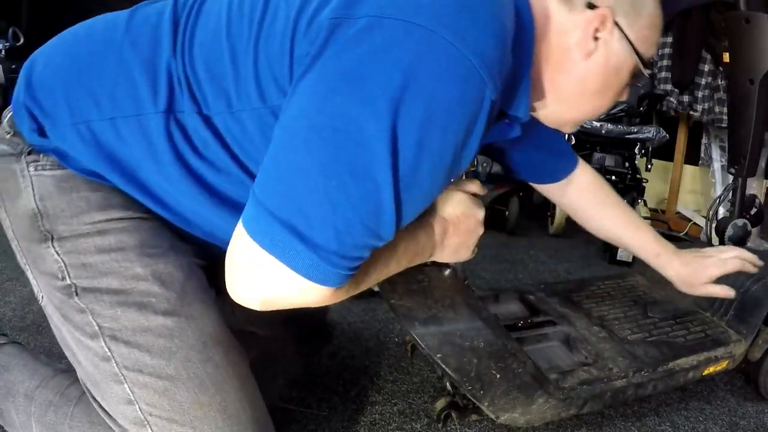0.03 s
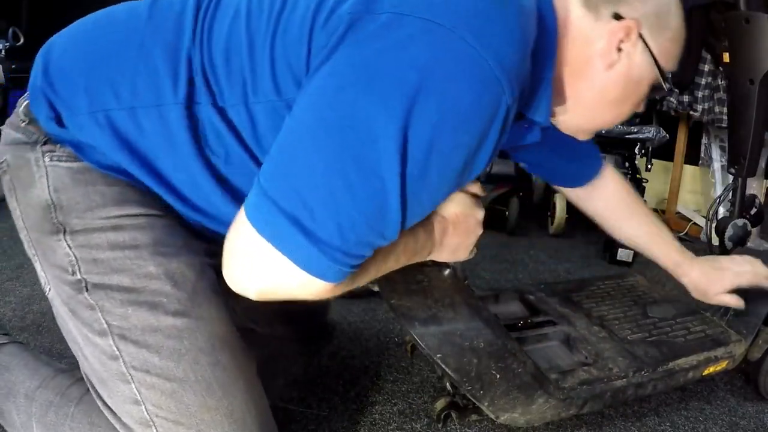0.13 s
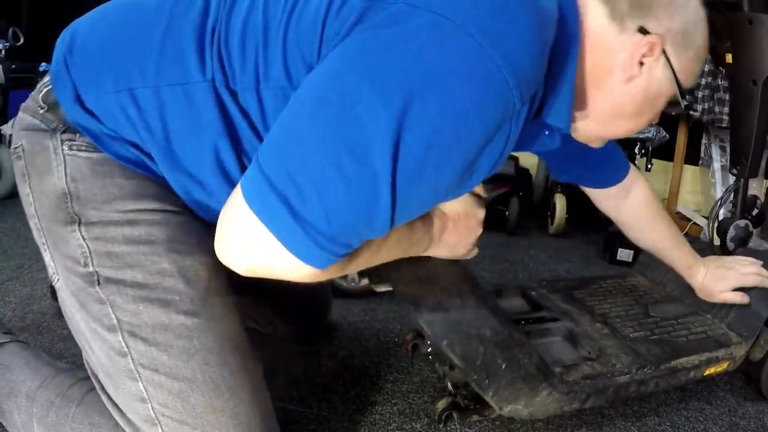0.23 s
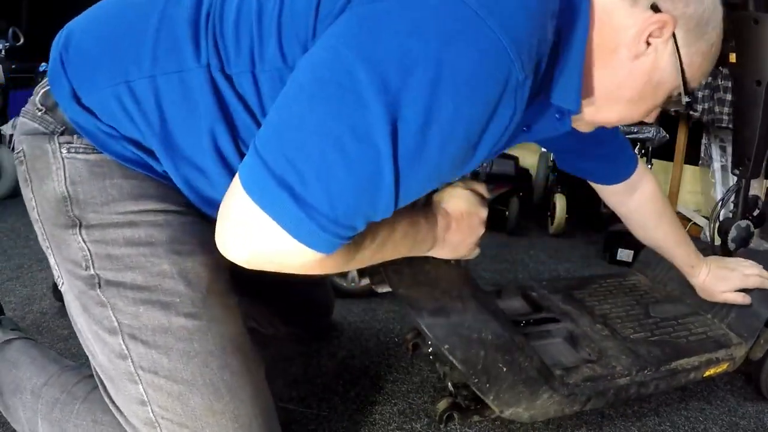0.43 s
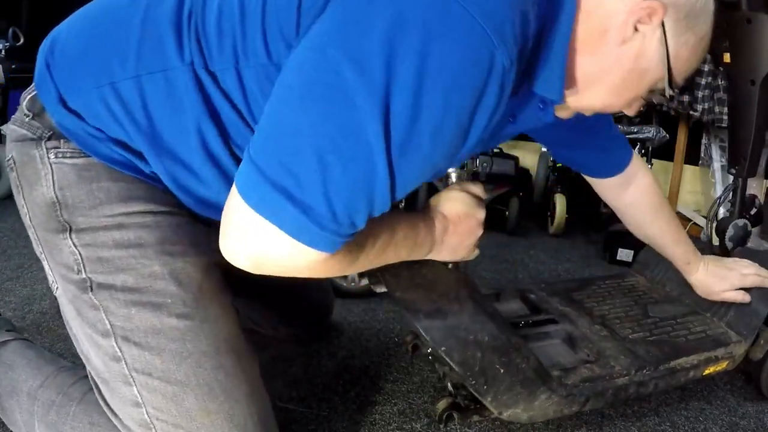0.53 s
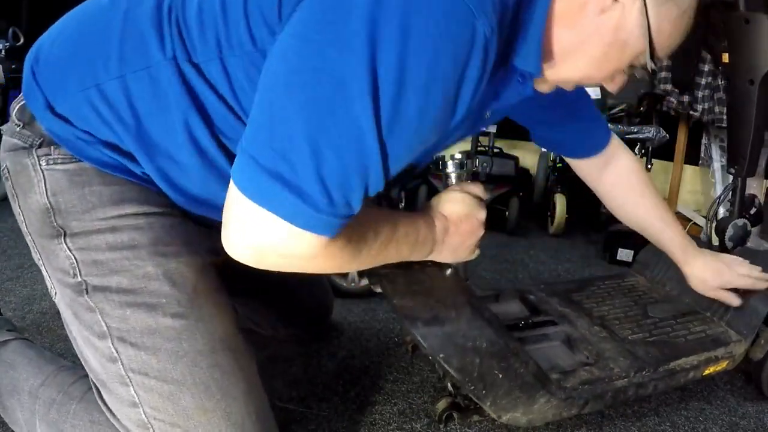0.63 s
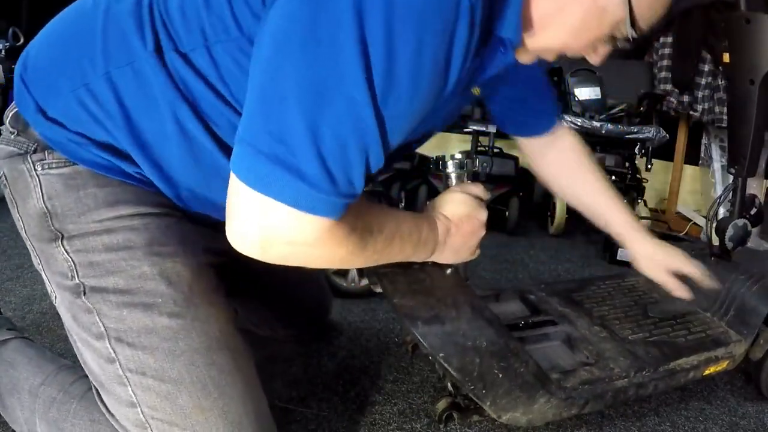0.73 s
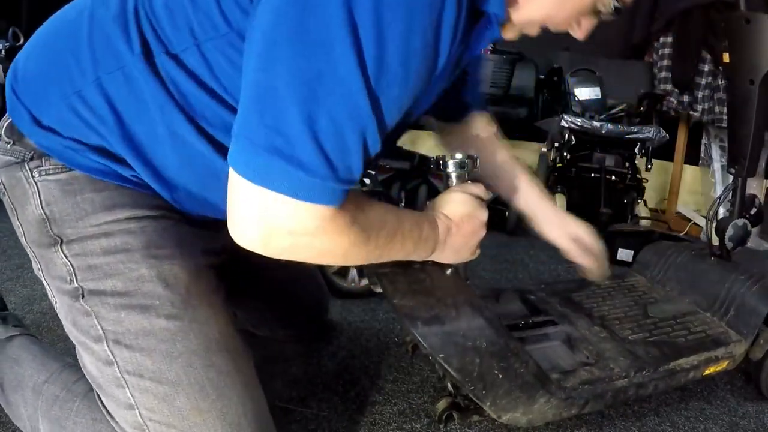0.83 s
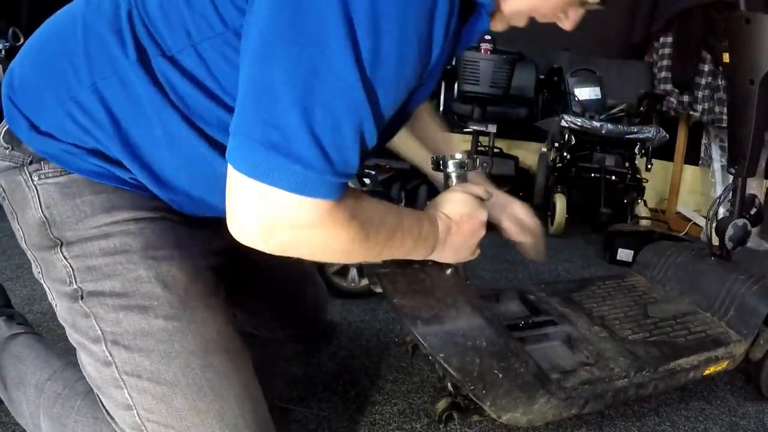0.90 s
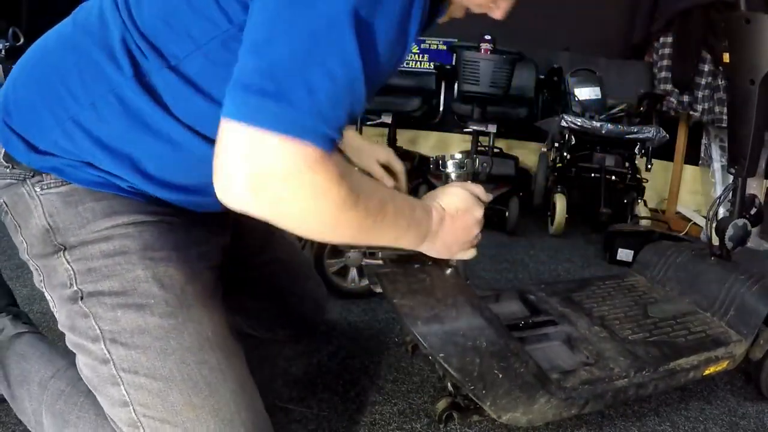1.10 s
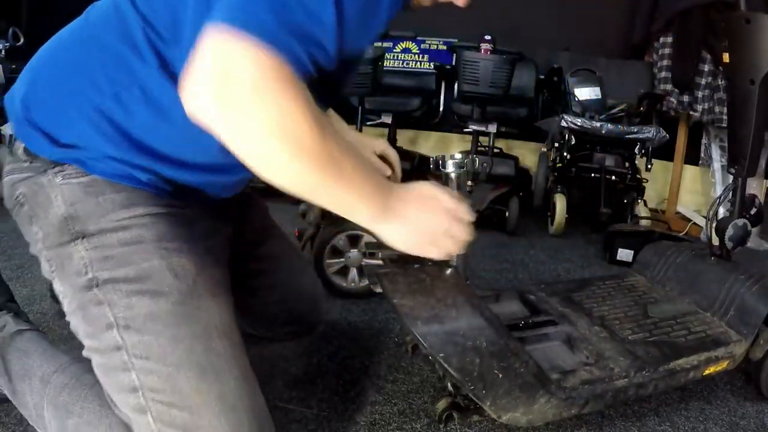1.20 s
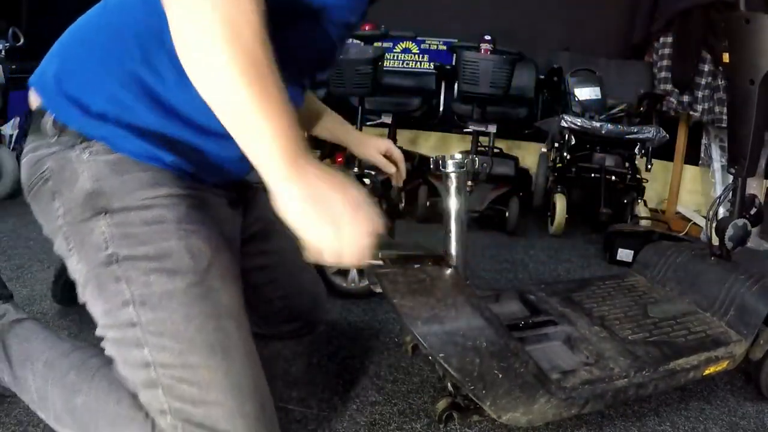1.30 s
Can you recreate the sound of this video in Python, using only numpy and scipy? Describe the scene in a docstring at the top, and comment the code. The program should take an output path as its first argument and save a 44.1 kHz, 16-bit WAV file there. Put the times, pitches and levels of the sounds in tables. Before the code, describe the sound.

One loud clank of metal and plastic scooter parts joining, followed by lighter knocks.

```python
"""Scooter frame pushed together

In a small workshop, steel tube and plastic deck meet in one loud clank: contacts clatter, the frame
rings and the chassis bounces on its tyres. Lighter knocks follow as the parts settle and are let go,
with a short scrape of the tube, a rustle of clothing and a dull bump near the end."""
import sys
import numpy as np
from scipy import signal
from scipy.io import wavfile
from scipy.ndimage import uniform_filter1d

SR = 44100
rng = np.random.default_rng(int(sys.argv[2]) if len(sys.argv) > 2 else 0)


def unload_wav(signal):
    """Save mono or channel-first audio to the path in sys.argv[1] as 16-bit WAV at rate SR, clipped to [-1, 1]."""
    wavfile.write(
        sys.argv[1],
        SR,
        np.round(np.clip(np.atleast_2d(signal).T, -1, 1) * 32767).astype(np.int16),
    )


N = 59535

# Contacts between parts. Each row: start in seconds, relative level in dB, part's lowest note in Hz,
# its Q, treble cutoff in Hz, ring gain in dB, tail gain in dB.
KNOCKS = [(0.228, -10, 203, 0.97, 8200, 5, -18), (0.2313, -1.5, 185, 1.28, 14100, 1.5, -5),
          (0.2345, -5, 560, 0.56, 12000, 0.5, -7), (0.237, -10, 233, 2.34, 6100, -35, -4),
          (.256, -9.5, 249, 2.14, 4560, 3, -11), (.322, -33.5, 232, 0.91, 2970, 4, -6),
          (0.421, -22, 1920, 1.05, 4530, 0.5, -3.5), (.445, -26, 476, 3.5, 540, 9, -2.5),
          (.45, -27, 96, 1.4, 390, 8, 3.5), (0.6334, -17, 658, 3.9, 2300, -6, -11.5),
          (0.6428, -19.5, 1000, 1.45, 3470, -24, -0.5), (0.6529, -22.5, 1480, 1.1, 4200, -15, -19),
          (0.6556, -21, 1477, 5.1, 2620, -20, -10), (.658, -18, 470, 1.62, 700, 9.5, -5.5),
          (.725, -32, 134, 1.07, 394, 5.5, 14), (.775, -33.5, 159, 2.1, 430, 3.5, 11),
          (0.886, -34.5, 3860, 2.5, 4140, -1, -7), (1.087, -10, 124, 1.23, 335, -6.5, -5.5),
          (1.0889, -29.5, 790, 1.3, 4800, 4.5, 1), (1.325, -29.5, 64.5, 6.6, 200, -0.5, 5.5)]
# Stereo width of knocks and cloth. Each row: frequency in Hz, side over mid in dB.
SIDE_DB = [(60, -29), (140, 1), (350, -37), (1200, -45), (2400, -22.5), (4400, -11), (8000, -7),
           (14000, 6.5)]


def knocks(t):
    """Each contact clatters, rings the frame and leaves a tail, all coloured by the struck part."""
    ring, out = frame_ring(t), np.zeros((2, N))
    for start_s, db, low_hz, q, soft_hz, ring_db, tail_db in KNOCKS:
        mid, side = (clatter(t, db) + amp(tail_db) * tail(t) for _ in range(2))
        hit = stereo(mid + amp(ring_db) * ring, side, SIDE_DB)
        add(out, start_s, amp(db) * struck_part(hit, low_hz, q, soft_hz))
    return out


def clatter(t, blow_db, base_decay_s=0.0077, click_share=0.19):
    """A contact click and brief chatter between the parts, longer after a harder blow."""
    # Each row: frequency in Hz, gain in dB.
    spectrum = [(40, -24.5), (110, 18), (200, 22), (420, 20.5), (560, 12.5), (1300, 9), (2500, 5),
                (3300, 0.5), (6000, -2), (9500, -11.5), (12500, -27), (16000, -22)]
    decay_s = base_decay_s * amp(blow_db) ** 0.067
    chatter = rng.standard_normal(N) * np.exp(-t / decay_s)
    chatter *= np.sqrt(1 - click_share) / np.linalg.norm(chatter)
    click = np.sqrt(click_share) * (t == 0)
    return colour(chatter + click, spectrum)


def frame_ring(t):
    """Frame modes; neighbours swing in opposite senses, so the ring builds over a few milliseconds."""
    # Each row: frequency in Hz, relative level in dB, T60 in seconds.
    modes = [(71.6, -25.5, 0.81), (94.7, -36.5, 1), (161.1, -41.5, 0.75), (214, -31.5, 0.12),
             (244, -37, 0.25), (265.7, -38.5, 0.26), (300, -37.5, 0.62), (355.8, -36.5, 0.23),
             (404.8, -40.5, 0.3), (481, -39, 0.62), (714.4, -39, 0.15), (794, -44, 0.26),
             (934.5, -44, 0.25), (1072, -35.5, 0.12), (1327, -49.5, 0.29), (1930, -40, 0.17),
             (2315, -39, 0.1), (2716, -36.5, 0.1), (3430, -45, .09), (2870, -51, 0.13), (6120, -34, 0.017)]
    return sum((-1) ** k * decay(t, t60_s) * tone(t, hz, db) for k, (hz, db, t60_s) in enumerate(modes))


def tail(t, rise_s=0.0076):
    """Dense ringing of deck and room, each band dying at its own rate."""
    # Each row: frequency in Hz, gain in dB.
    spectrum = [(40, -28), (120, 24.5), (200, 12), (450, 16.5), (600, 8), (1300, 4), (2400, 3.5), (3300, 1),
                (6000, -3.5), (9500, -7.5), (12500, -17.5), (16000, -46)]
    # Each row: frequency in Hz, T60 in seconds.
    ring_times = [(100, 0.52), (400, 0.7), (900, 0.86), (2000, 0.59), (5000, 0.43), (13000, 0.26)]
    hz, frame_s, bands = signal.stft(rng.standard_normal(N), SR, nperseg=256)
    bands *= decay(frame_s, value_at(ring_times, hz)[:, None])
    wash = signal.istft(bands, SR)[1][:N]
    wash *= 1 - np.exp(-t / rise_s)
    return colour(wash / np.linalg.norm(wash), spectrum)


def struck_part(x, low_hz, q, soft_hz):
    """A part radiates little below its lowest resonance; a soft contact loses treble."""
    w = 2 * SR * np.tan(np.pi * low_hz / SR)
    highpassed = signal.lfilter(*signal.bilinear([1, 0, 0], [1, w / q, w * w], SR), x)
    return signal.lfilter(*signal.butter(2, soft_hz, fs=SR), highpassed)


def bounces(t, shudder_db=-10.5):
    """The chassis swings on its tyres, swelling and fading; the deck shudders with it."""
    # Each row: start in seconds, frequency in Hz, peak in dB, swell in seconds, fade in seconds.
    swings = [(0.2475, 49.4, -7, 0.025, 0.029), (.359, 45.04, -16, 0.011, 0.19),
              (0.697, 39.27, -24.5, 0.01, 0.17), (1.09, 68.7, -24, 0.0095, 0.065)]
    # Each row: frequency in Hz, gain in dB.
    shudder_spectrum = [(20, -19), (45, -12), (72, -1.5), (95, -13), (120, -26.5), (160, -7), (200, -39.5),
                        (600, -86.5)]
    out = np.zeros((2, N))
    for start_s, hz, db, swell_s, fade_s in swings:
        swell = np.sin(np.pi / 2 * np.minimum(t / swell_s, 1))
        fade = np.exp(-np.maximum(t - swell_s, 0) / fade_s)
        shudder = amp(shudder_db) * unit_rms(colour(rng.standard_normal(N), shudder_spectrum))
        bounce = amp(db) * swell * fade * (tone(t, hz) + shudder)
        add(out, start_s, bounce[None])
    return out


def tube_scrape(t, slips_per_s=1500, t60_s=0.1):
    """Tiny uneven slips ring a steel tube as it slides in its socket."""
    # Each row: frequency in Hz, relative level in dB.
    modes = [(1520, 0), (2850, -6), (4190, 0), (6340, -7)]
    # Each row: time in seconds, level in dB.
    stroke = [(.675, -55), (.718, -50), (.75, -68)]
    slips = rng.standard_normal(N) * (rng.random(N) < slips_per_s / SR)
    ring = decay(t, t60_s) * sum(tone(t, hz, db) for hz, db in modes)
    return unit_rms(signal.fftconvolve(slips, ring)[:N]) * envelope(t, stroke)


def cloth_rustle(t, grain_db=1):
    """Grainy hiss of clothing sliding as the arm moves."""
    # One curve per movement. Each point: time in seconds, level in dB.
    movements = [
        [(.52, -68), (.59, -50.5), (.66, -49.5), (.69, -42.5), (.716, -43), (.79, -60.5)],
        [(1.1, -81), (1.24, -59), (1.29, -58), (1.35, -54)],
    ]
    # Each row: frequency in Hz, gain in dB.
    spectrum = [(200, 8.5), (1200, -1.5), (4000, -2.5), (8500, -7.5), (12000, -18.5), (16000, -29)]
    grain = amp(grain_db * unit_rms(uniform_filter1d(rng.standard_normal(N), size=120)))
    mid, side = (unit_rms(colour(rng.standard_normal(N) * grain, spectrum)) for _ in range(2))
    return stereo(mid, side, SIDE_DB) * sum(envelope(t, curve) for curve in movements)


def air():
    """Steady rumble of workshop air, with hiss."""
    # Each row: frequency in Hz, gain in dB.
    spectrum = [(15, -18), (35, -13), (65, -18), (120, -35), (250, -43), (1200, -51), (5000, -51.5),
                (10000, -57), (15000, -59)]
    # Each row: frequency in Hz, side over mid in dB.
    width = [(50, -16.5), (400, -6), (6000, -4.5), (12000, -1.5)]
    mid, side = (colour(rng.standard_normal(N), spectrum) for _ in range(2))
    return stereo(mid, side, width)


def whines(t):
    """Faint thin tones: two stop at the first knock, a higher one stays."""
    # Each row: frequency in Hz, level in dB.
    early_tones = [(4382, -75), (5421, -72.5)]
    early = sum(tone(t, hz, db) for hz, db in early_tones)
    return (t < KNOCKS[0][0]) * early + tone(t, hz=8500, db=-82)


def amp(db):
    """Decibels to gain."""
    return 10 ** (np.asarray(db) / 20)


def tone(t, hz, db=0):
    """Sine with its peak at db."""
    return amp(db) * np.sin(2 * np.pi * hz * t)


def decay(t, t60_s):
    """Gain falling 60 dB in t60_s."""
    return np.exp(-np.log(1000) * t / t60_s)


def envelope(t, curve):
    """Gain along an (s, dB) curve, zero outside it."""
    return amp(np.interp(t, *np.transpose(curve), left=-np.inf, right=-np.inf))


def value_at(points, hz):
    """Table value at hz, on a log-frequency axis."""
    point_hz, values = np.transpose(points)
    return np.interp(np.log(hz + 1), np.log(point_hz + 1), values)


def unit_rms(x):
    """Scales to rms 1."""
    return x / np.sqrt(np.mean(x ** 2) + 1e-20)


def colour(x, spectrum, size=4096):
    """Minimum-phase filter along a (Hz, dB) curve."""
    hz = abs(np.fft.fftfreq(size, 1 / SR))
    log_gain = np.log(amp(value_at(spectrum, hz)))
    response = np.exp(np.conj(signal.hilbert(log_gain)))
    taps = np.fft.ifft(response).real[:size // 2]
    return signal.fftconvolve(x, taps)[:len(x)]


def stereo(mid, side, width):
    """Left and right from mid and side; a (Hz, dB) width curve filters the side."""
    side = colour(side, width)
    return np.array([mid + side, mid - side])


def add(mix, start_s, sound):
    """Mixes a sound in at start_s."""
    part = mix[:, round(start_s * SR):]
    part += sound[:, :part.shape[1]]


def scene():
    """Scooter and clothing over the workshop background."""
    t = np.arange(N) / SR
    scooter = amp(9.5) * knocks(t) + bounces(t) + tube_scrape(t)
    return scooter + cloth_rustle(t) + amp(-4.5) * air() + whines(t)


def record(dry):
    """Rounds off the loudest peaks and limits the band."""
    cutoff_hz = 15400
    lowpass = signal.firwin(255, cutoff_hz, window=("kaiser", 9), fs=SR)
    return signal.oaconvolve(np.tanh(dry), lowpass[None], "same")


dry = scene()
out = record(dry)
unload_wav(out)
```